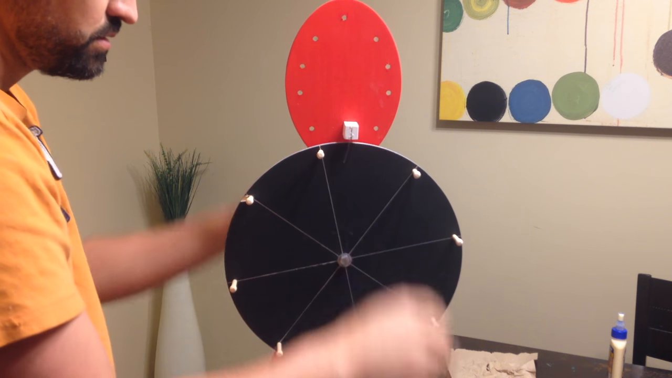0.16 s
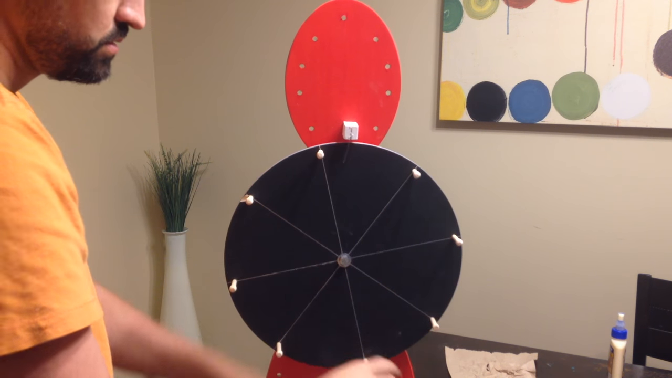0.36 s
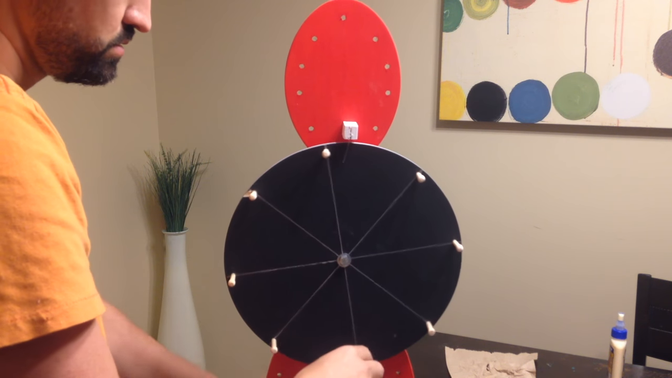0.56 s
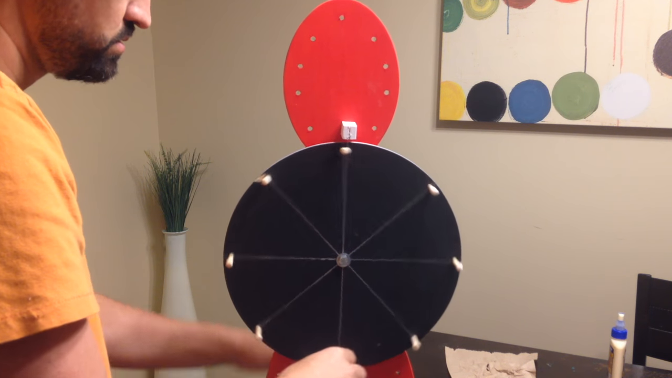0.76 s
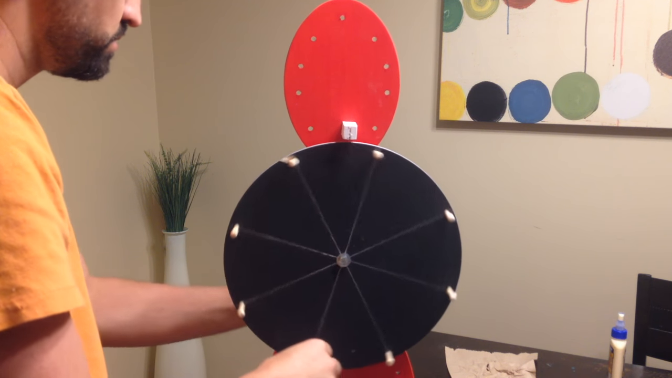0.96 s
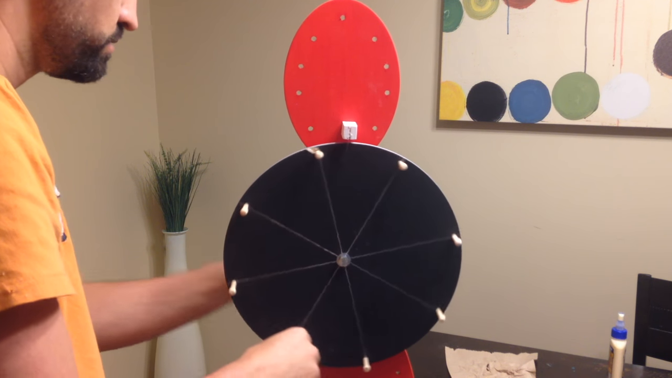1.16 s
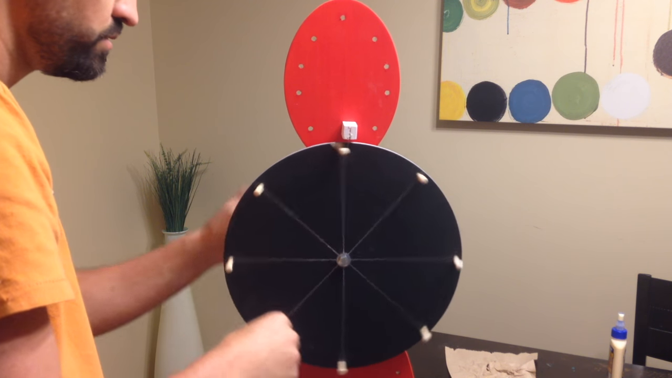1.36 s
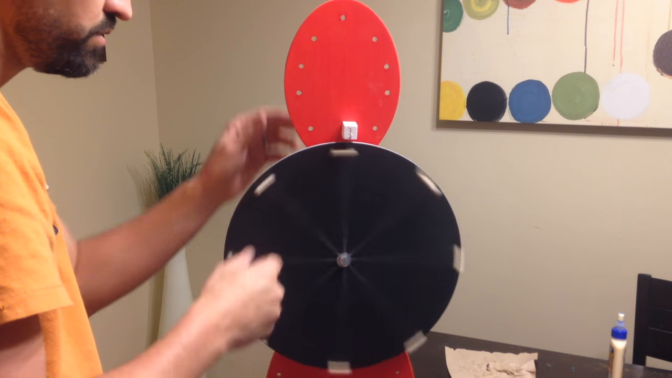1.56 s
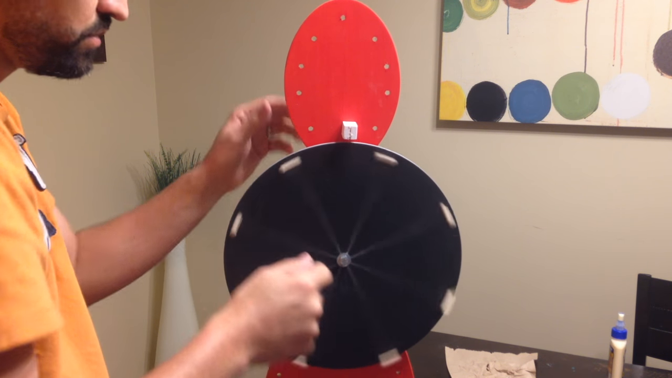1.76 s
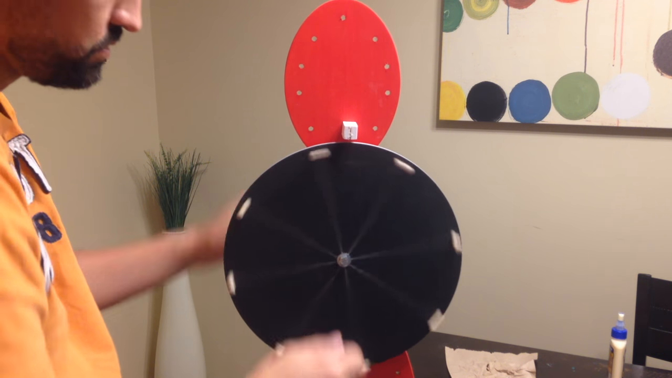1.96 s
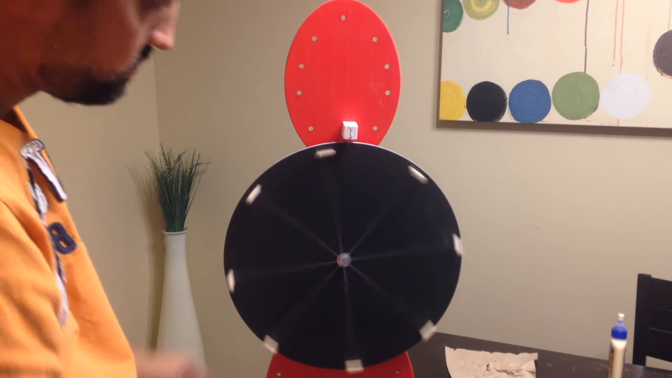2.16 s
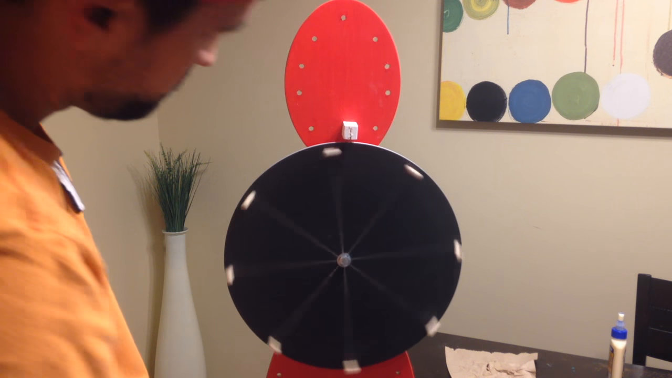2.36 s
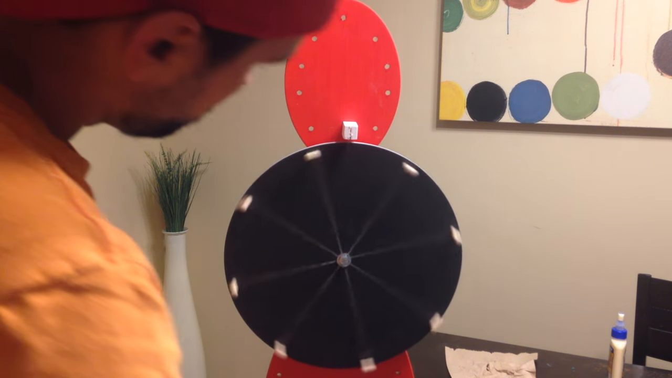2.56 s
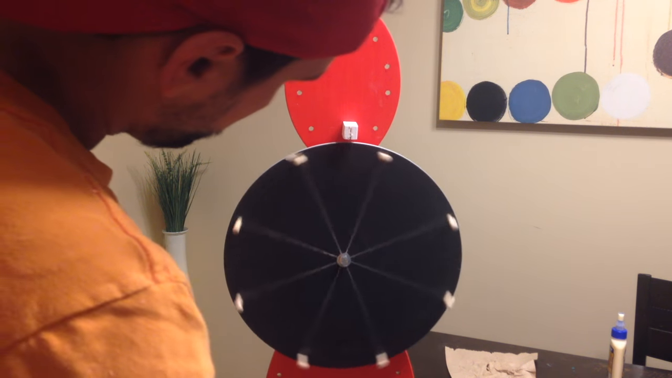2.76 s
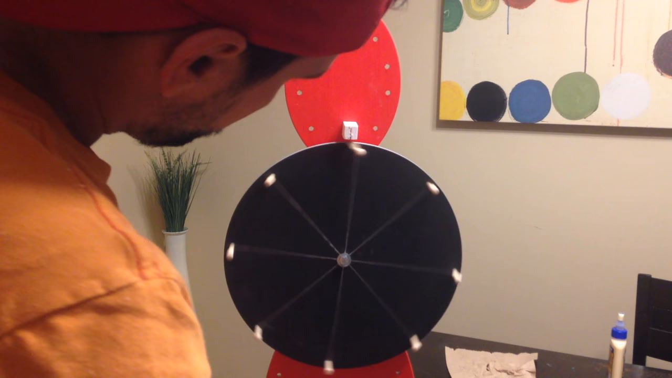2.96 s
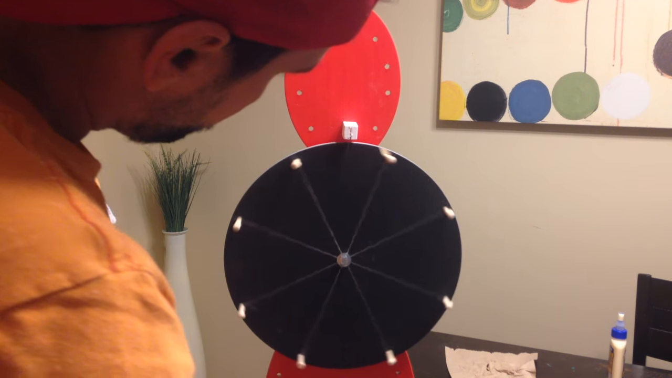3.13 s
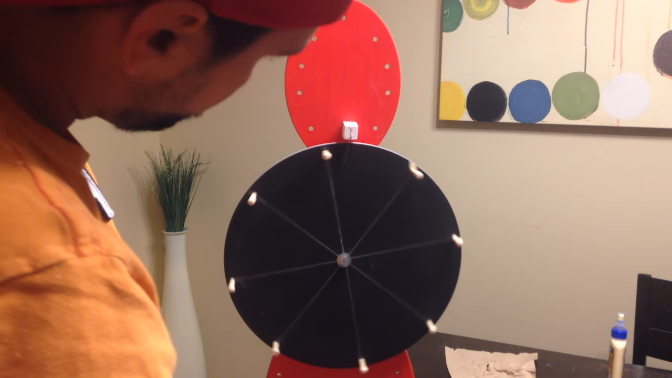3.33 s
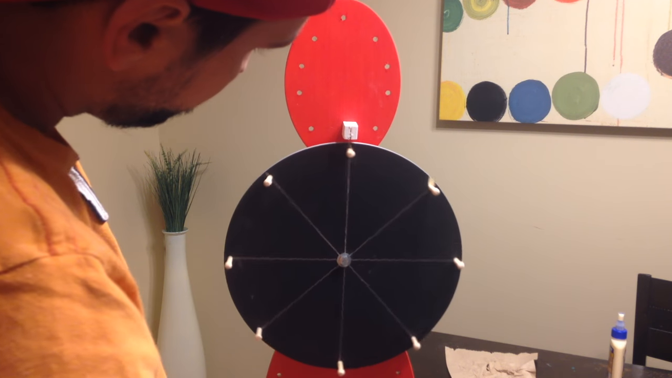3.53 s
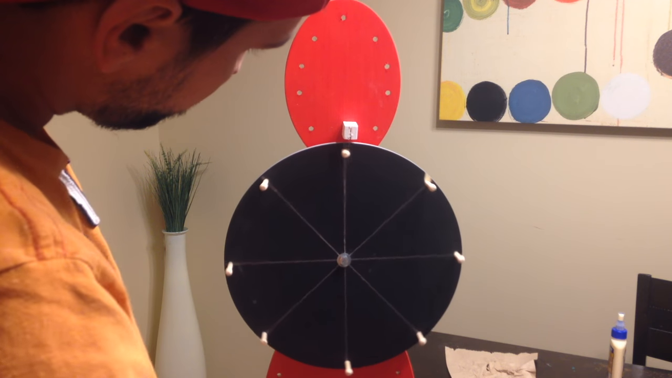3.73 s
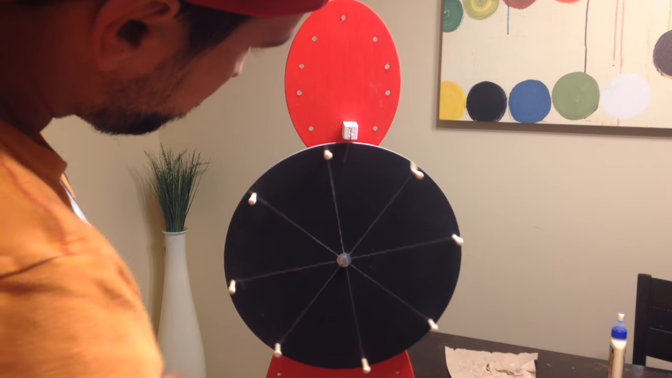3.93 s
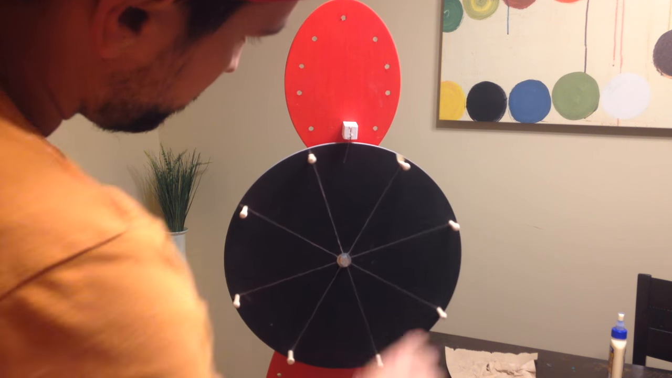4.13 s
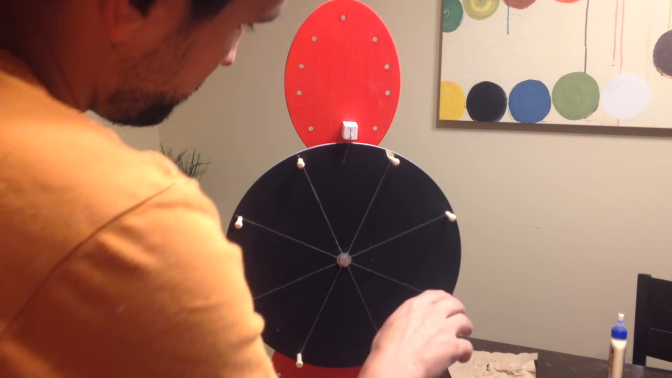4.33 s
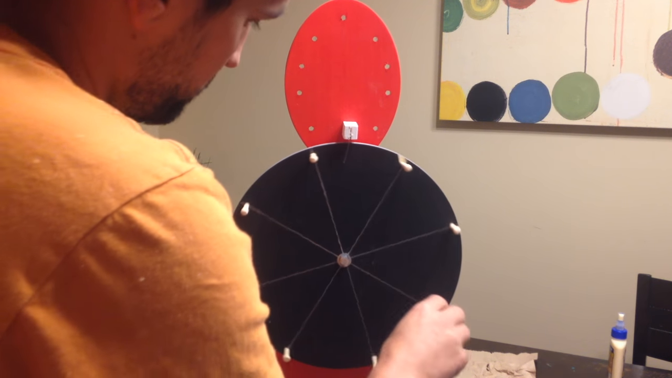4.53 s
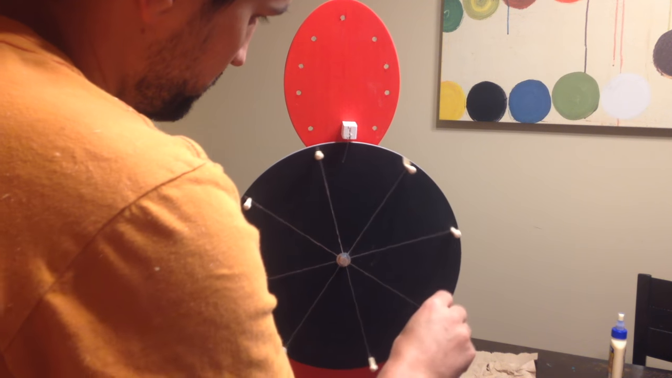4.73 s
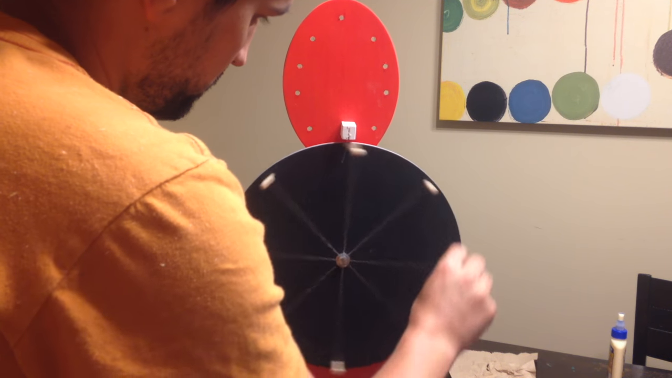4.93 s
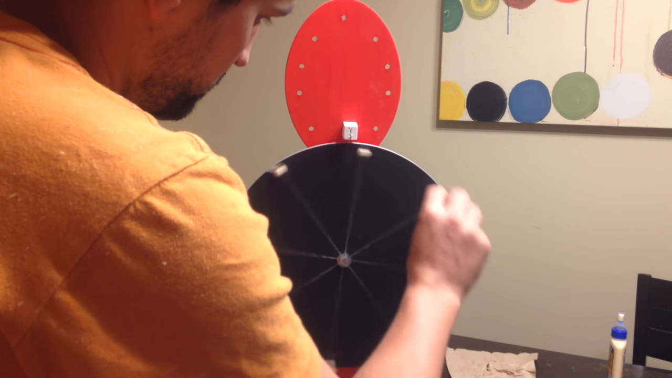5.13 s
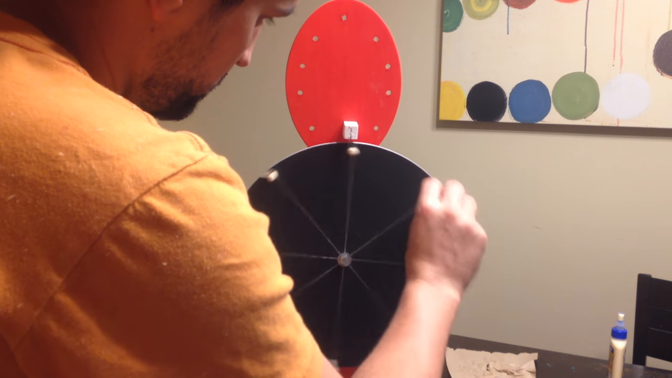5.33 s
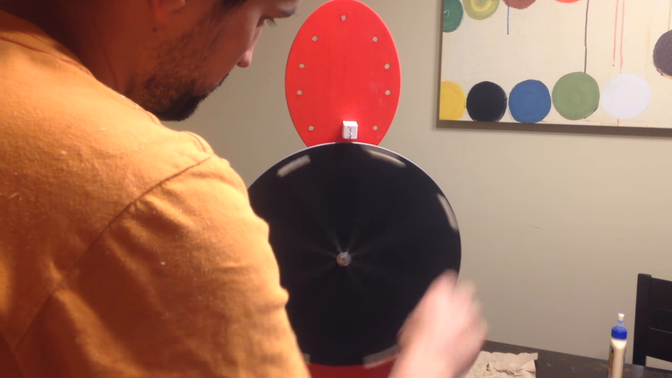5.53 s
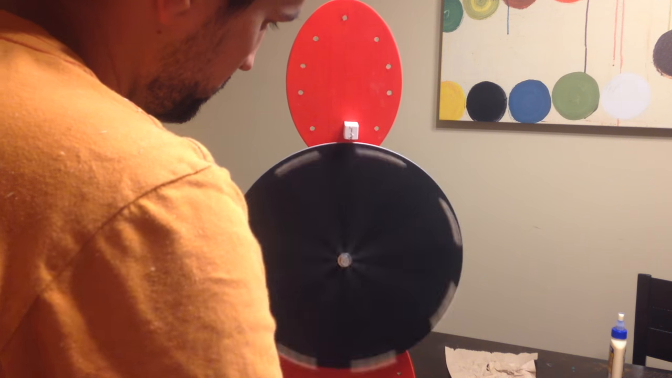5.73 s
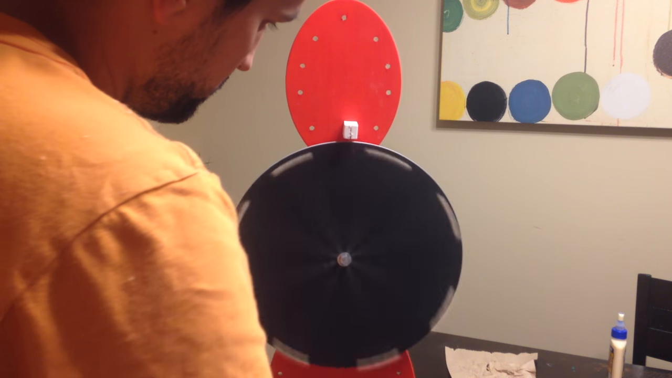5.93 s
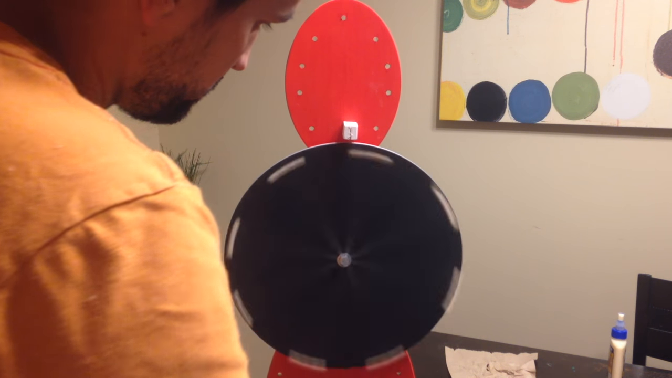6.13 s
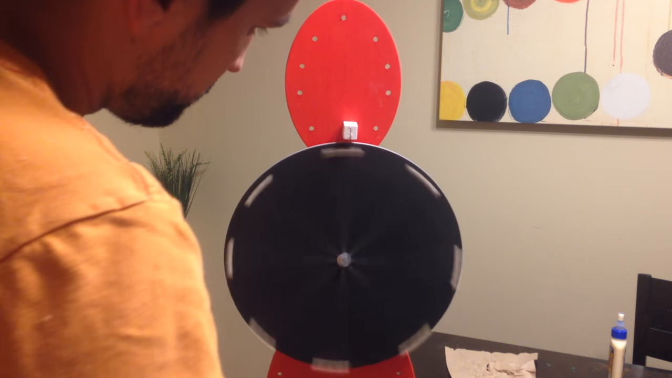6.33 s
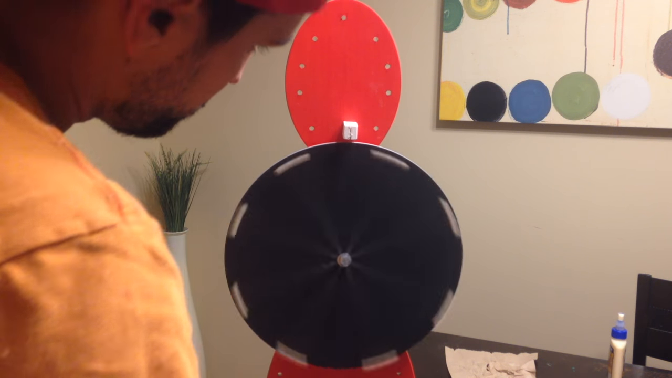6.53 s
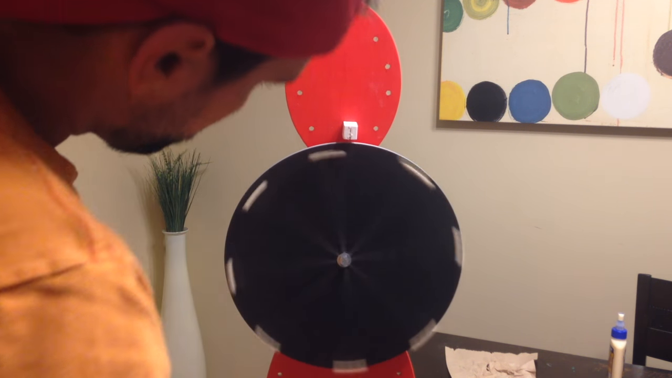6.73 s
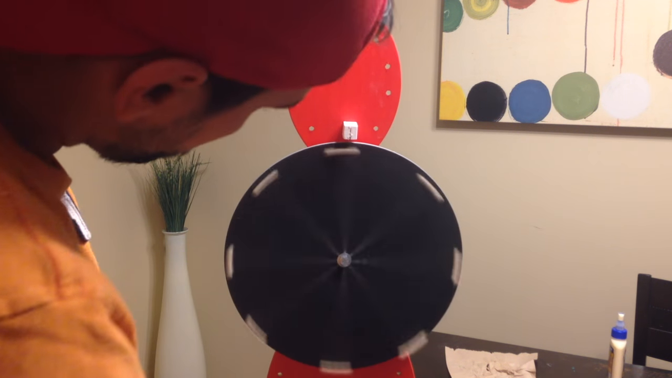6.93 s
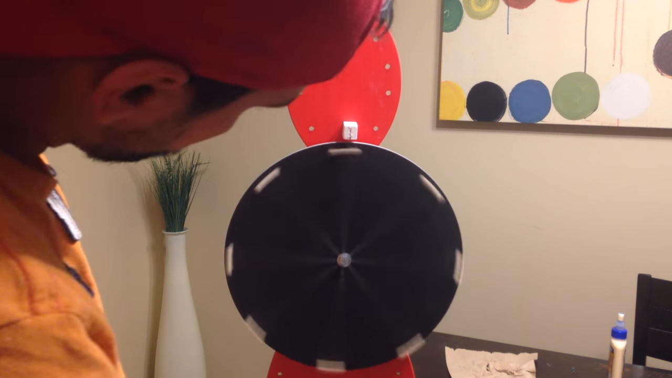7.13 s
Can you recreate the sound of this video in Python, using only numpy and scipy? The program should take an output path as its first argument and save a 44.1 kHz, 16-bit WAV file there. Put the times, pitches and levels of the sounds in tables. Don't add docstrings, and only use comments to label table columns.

```python
import sys
import numpy as np
from scipy import signal
from scipy.fft import rfft, irfft
from scipy.io import wavfile
from scipy.ndimage import uniform_filter1d

SR = 44100
rng = np.random.default_rng(int(sys.argv[2]) if len(sys.argv) > 2 else 0)


def digitize_waveform(pressure):
    field = np.atleast_2d(pressure).T
    bounded = np.clip(field, -1, 1)
    quanta = np.round(bounded * 32767).astype(np.int16)
    wavfile.write(sys.argv[1], SR, quanta)


def decibels_to_gain(level_db):
    exponent = np.asarray(level_db, float) / 20
    return 10 ** exponent


N = 316946


def evened(x):
    return x / np.sqrt(np.mean(x ** 2) + 1e-20)


def read(points, hz, axis=1):
    table = np.transpose(points)
    return np.interp(np.log(hz + 1), np.log(table[0] + 1), table[axis])


def coloured(points):
    hz = np.fft.rfftfreq(N, 1 / SR)
    spectrum = rfft(rng.standard_normal(N)) * decibels_to_gain(read(points, hz))
    return evened(irfft(spectrum, N))


def add(mix, s, sound):
    part = mix[round(s * SR):][:len(sound)]
    part += sound[:len(part)]


def ring(t, hz, t60_s, rise_s):
    return decibels_to_gain(-60 * t / t60_s) * (1 - np.exp(-t / rise_s)) * np.sin(2 * np.pi * hz * t)


def sparse_blows(t, per_s):
    return rng.standard_normal(len(t)) * (rng.random(len(t)) < per_s / SR)


# (frequency [Hz], level [dB rms])
HUM_PARTIALS = [(59.5, -62), (119, -87), (178.5, -91.5)]
# (frequency [Hz], density [dB per Hz])
HISS_SPECTRUM = [(20, -19), (45, -1), (85, -1.5), (123, -2.5), (250, -10), (600, -14.5), (1400, -22.5),
                 (1960, -21), (3230, -29.5), (4290, -23), (5300, -29.5), (6800, -31.5), (9000, -35.5),
                 (15500, -37.5)]


def background():
    hiss_db, waver_db = -67, 0.98
    t = np.arange(N) / SR
    waver = evened(uniform_filter1d(rng.standard_normal(N), 3000))
    hum = sum(decibels_to_gain(db) * np.sqrt(2) * np.sin(2 * np.pi * hz * t) for hz, db in HUM_PARTIALS)
    return decibels_to_gain(hiss_db) * coloured(HISS_SPECTRUM) + hum * decibels_to_gain(waver_db * waver)


# (start [s], length [s], level [dB])
RUB_EVENTS = [
    (0.53, 0.13, -71),
    (0.874, 0.42, -68),
    (4.362, 0.13, -61),
    (4.59, 0.22, -66),
    (4.86, 0.04, -77),
    (5.195, 0.15, -70),
]
# (frequency [Hz], density [dB per Hz])
RUB_SPECTRUM = [(200, -38), (500, -11), (1000, -9), (1600, -5), (2400, -6), (3300, -13), (5000, -21.5),
                (7000, -20.5), (9000, -26.5), (15500, -38)]


def rubs():
    rise_s, sag_db = 0.031, -4.5
    t, level = np.arange(N) / SR, np.zeros(N)
    for s, length_s, db in RUB_EVENTS:
        level += np.interp(t - s, [0, rise_s, length_s], [0, decibels_to_gain(db), decibels_to_gain(db + sag_db)], left=0, right=0)
    clumps_db = 3 * evened(uniform_filter1d(rng.standard_normal(N), 200))
    return uniform_filter1d(level, 700) * decibels_to_gain(clumps_db - 5.5) * coloured(RUB_SPECTRUM)


# (time [s], peak [dB], pitch [Hz])
PALM_BUMPS = [
    (.055, -48, 795),
    (.675, -50.5, 650),
    (.7, -49, 814),
    (1.04, -53, 490),
    (4.45, -53, 790),
    (5.125, -55, 950),
    (5.715, -39, 460),
    (3.145, -46, 557),
]


def bumps():
    out, t = np.zeros(N), np.arange(SR // 8) / SR
    for s, db, hz in PALM_BUMPS:
        add(out, s, decibels_to_gain(db) * ring(t, hz, t60_s=0.035, rise_s=0.003))
    return out


# (time [s], peak [dB], pitch [Hz])
FINGER_TAPS = [
    (3.5835, -63, 1250),
    (4.149, -57, 1630),
    (4.9187, -63.5, 2100),
    (5.3874, -49.5, 1580),
    (5.4563, -57, 2020),
    (5.5013, -43, 1740),
]
# (ratio to pitch, level [dB])
TAP_OVERTONES = [(1.2, 0), (1.42, -3), (2.36, -12.5), (3.0, -15)]


def taps():
    t60_s = 0.012
    out, t = np.zeros(N), np.arange(SR // 20) / SR
    for s, db, hz in FINGER_TAPS:
        upper = sum(decibels_to_gain(d) * ring(t, ratio * hz, t60_s, 0.00078) for ratio, d in TAP_OVERTONES)
        add(out, s, decibels_to_gain(db + 8) * (ring(t, hz, t60_s, 0.00022) + upper))
    return out


# (time [s], peak [dB], upper edge [Hz], sparkle [dB])
NAIL_FLICKS = [
    (0.6432, -29.5, 3780, -7.5),
    (0.653, -68, 3260, -8),
]


def flicks():
    def filtered(x, order, hz, kind):
        return signal.sosfilt(signal.butter(order, hz, kind, fs=SR, output="sos"), x)

    out = np.zeros(N)
    thin = filtered(signal.unit_impulse(SR // 20), 6, 1460, "high")
    sparkle = filtered(thin, 2, 7000, "low")
    for s, db, top_hz, sparkle_db in NAIL_FLICKS:
        dull = filtered(thin, 3, top_hz, "low")
        add(out, s, decibels_to_gain(db + 22) * (dull + decibels_to_gain(sparkle_db) * sparkle))
    return out


# (time [s], peak [dB], crack [dB rel], thud [dB rel])
SLAPS_SLOW = [(0.053, -57, -22, -14), (1.031, -37.5, -10.5, -20.5), (1.569, -37.5, -7, -17),
              (1.715, -36.5, -10.5, -20.5), (1.849, -36.5, -13.5, -24), (2.013, -37, -8, -21),
              (2.174, -35.5, -14, -25), (2.37, -38.5, -8.5, -25), (2.568, -36, -12.5, -24.5),
              (2.833, -39.5, -10, -20), (3.142, -39.5, -5, -21), (5.121, -46, -6, -27)]
# (time [s], peak [dB], crack [dB rel], thud [dB rel])
SLAPS_FAST = [(5.638, -37.5, -7.5, -16), (5.718, -30, -13, -18), (5.785, -39, -3, -26),
              (5.846, -37, -2, -12.5), (5.897, -35.5, 1, -39), (5.967, -28.5, -14, -21),
              (6.054, -33.5, -18, -23), (6.124, -38.5, -3.5, -25), (6.172, -38.5, -10, -38),
              (6.253, -38, -22, -10.5), (6.33, -40, -27, -40), (6.396, -40, 0.5, -13.5),
              (6.478, -37, -12, -25), (6.568, -38.5, -28, -24), (6.635, -33.5, -18, -21),
              (6.718, -39.5, -2.5, -22), (6.803, -36.5, -31, -20), (6.889, -39, -25, -21),
              (6.999, -42, -11, -33), (7.083, -38.5, -5, -16), (7.177, -36.5, -14, -32)]
# (frequency [Hz], level [dB], t60 [s])
BOARD_MODES = [(352.6, -18.5, 0.14), (520.5, -12.5, 0.062), (826, -17.5, 0.068), (893, -23, 0.091),
               (940, -9.5, 0.096), (1071, -14.5, 0.28), (1132, -9.5, 0.24), (1152, 1, 0.075),
               (1262, 1, 0.083), (1267, -8, 0.085), (1396, 1.5, 0.042), (1630, 2, 0.051), (1660, -4, 0.073),
               (2045, -2, 0.03), (2240, -16, 0.045), (2500, -41, 0.022), (2860, -0.5, 0.025),
               (2870, -1.5, 0.015), (3700, -7.5, 0.028), (4570, -39, .04)]
# (frequency [Hz], level [dB], t60 [s])
STAND_MODES = [(122.4, -2.5, 0.26), (181.8, -0.5, 0.14)]
# (frequency [Hz], density [dB per Hz])
SCRAPE_SPECTRUM = [(710, -26.5), (1200, -2.5), (2270, 5), (3220, -20.5), (3870, -14), (7820, -16),
                   (11400, -20), (14200, -17.5), (16000, -21)]


def struck_board(t, db, tilt_db, vary):
    firm_db, dull_db_per_db, detune = -34.5, 0.3776, 0.0087
    settle_per_s, settle_db, settle_t60_s = 500, -12.5, 0.071
    tilt_db = tilt_db + dull_db_per_db * min(db - firm_db, 0)
    modes = np.zeros(len(t))
    for (hz, d, t60_s), v, w in zip(BOARD_MODES, vary, vary[len(BOARD_MODES):]):
        mode_db = d + 2.2 * v + tilt_db * np.log2(hz / 1200)
        modes += decibels_to_gain(mode_db) * ring(t, hz * (1 + detune * w), t60_s, 0.001)
    blows = decibels_to_gain(settle_db - 60 * t / settle_t60_s) * sparse_blows(t, settle_per_s)
    blows[0] = 1
    return signal.fftconvolve(blows / np.linalg.norm(blows), decibels_to_gain(1.5) * modes)[:len(t)]


def tip_scrape(t, lead_s, noise, snap, whistle_hz):
    shape = np.where(t < lead_s, np.exp((t - lead_s) / 0.0012), decibels_to_gain(-60 * (t - lead_s) / 0.007))
    scrape = decibels_to_gain(-7) * shape * noise
    add(scrape, lead_s, decibels_to_gain(-16.5) * snap)
    return scrape + decibels_to_gain(1) * signal.lfilter(*signal.iirpeak(whistle_hz, 1.6, SR), scrape)


def slaps():
    slow_tilt_db, slow_tip_hz = 1.5, 8400
    fast_tilt_db, fast_tip_hz = -0.7, 6360
    tip_spread, lead_s = 0.056, 0.014
    out, t = np.zeros(N), np.arange(SR // 3) / SR
    rows = [(*p, slow_tilt_db, slow_tip_hz) for p in SLAPS_SLOW]
    rows += [(*p, fast_tilt_db, fast_tip_hz) for p in SLAPS_FAST]
    chatter = coloured(SCRAPE_SPECTRUM)
    snap_spectrum = decibels_to_gain(read(SCRAPE_SPECTRUM, np.fft.rfftfreq(256, 1 / SR)))
    snap = 2 * evened(np.roll(irfft(snap_spectrum), 128))
    thud = sum(decibels_to_gain(d) * ring(t, hz, t60_s, 0.022) for hz, d, t60_s in STAND_MODES)
    for s, db, crack_db, thud_db, tilt_db, tip_hz in rows:
        bend, *vary = rng.standard_normal(2 * len(BOARD_MODES) + 1)
        board = struck_board(t, db, tilt_db, vary)
        add(out, s, decibels_to_gain(db) * (decibels_to_gain(-4.5) * board + decibels_to_gain(thud_db + 6) * thud))
        noise = np.resize(chatter[round(s * SR):], len(t))
        scrape = tip_scrape(t, lead_s, noise, snap, tip_hz * (1 + tip_spread * bend))
        add(out, s - lead_s - 0.002, decibels_to_gain(db + crack_db + 11.5) * scrape)
    return out


# (time [s], peak [dB], peg pitch [Hz], rattle [dB rel])
PEGS_SLOW = [(0.0512, -55, 1610, -11), (0.54, -60.5, 2290, -23), (0.861, -57, 1910, -13.5),
             (0.9863, -53.5, 2020, -19), (1.1438, -51, 2000, -29), (1.4828, -48.5, 1920, -17),
             (1.5353, -52, 2300, -13), (1.6755, -33, 2310, -11), (1.8077, -37, 2500, -7.5),
             (1.9684, -35.5, 2090, -10), (2.1207, -33, 1710, -12.5), (2.3159, -43.5, 1790, -8.5),
             (2.5038, -47, 2170, -7.5), (2.757, -45.5, 1820, -12), (3.028, -36, 1980, -24.5),
             (4.3932, -50.5, 2370, -31), (5.0686, -37, 1955, -22)]
# (time [s], peak [dB], peg pitch [Hz], rattle [dB rel])
PEGS_FAST = [(5.6077, -31, 2100, -18.5), (5.695, -30, 2440, -6.5), (5.7524, -30.5, 1600, -3),
             (5.8237, -23, 2240, -13.5), (5.881, -22, 2280, -16.5), (5.9539, -22.5, 2450, -15),
             (6.0133, -26.5, 2300, -11.5), (6.0863, -37, 2240, -3.5), (6.1585, -20, 1910, -19),
             (6.2256, -31.5, 2060, -5), (6.2985, -34.5, 1720, -2.5), (6.3803, -25.5, 2115, -14),
             (6.4514, -19.5, 2283, -17.5), (6.5356, -30.5, 1680, -10), (6.608, -23, 2280, -12.5),
             (6.695, -33.5, 1900, -11), (6.773, -27, 2300, -12), (6.8667, -26.5, 2310, -10.5),
             (6.9535, -35.5, 2260, -5.5), (7.0535, -31, 1660, -14.5), (7.1437, -25, 2280, -14)]
# (time [s], peak [dB], pitch [Hz])
PEG_SKIPS = [(1.657, -39, 1580), (1.6932, -32, 2240), (1.8241, -29.5, 2530), (2.1444, -32.5, 2270),
             (2.358, -43.5, 2406), (2.514, -45, 1670), (2.5296, -38, 2380), (3.023, -45, 2120),
             (3.0454, -52, 2040), (2.334, -44, 2010), (2.775, -45, 1930), (5.075, -48, 2080),
             (4.4083, -56, 2570), (5.8956, -26, 2550), (5.968, -22, 2314), (6.025, -23.5, 2350),
             (6.1005, -30, 1940), (6.2323, -24, 2220), (6.3063, -26.5, 2590), (6.5487, -27.5, 2490),
             (6.6294, -29, 2220), (6.7938, -28.5, 1820), (6.9612, -30.5, 2500), (7.005, -48, 1990),
             (7.0644, -28, 2094), (7.1594, -44, 2260)]
# (frequency [Hz], density [dB per Hz])
RATTLE_SPECTRUM = [(240, -31), (400, -26.5), (839, -15), (1110, -5), (1460, -8.5), (2290, -4), (3070, -12),
                   (3690, -10.5), (14600, -27), (16000, -24)]


def peg_tick(t, hz):
    grip = rng.uniform(0.11, 0.173, 2)
    tick = ring(t, hz, 0.014, 0.001)
    tick += decibels_to_gain(-14) * ring(t, (1 + grip[0]) * hz, 0.023, 0.0036)
    tick += decibels_to_gain(-13) * ring(t, (1 - grip[1]) * hz, 0.013, 0.0015)
    return tick + decibels_to_gain(-14.5) * ring(t, 1.65 * hz, 0.012, 0.002)


def knocks():
    slow_t60_s, fast_t60_s = 0.06, 0.072
    skip_rattle_db, skip_t60_s = -20.5, 0.041
    out, t = np.zeros(N), np.arange(SR // 10) / SR
    rows = [(*p, slow_t60_s) for p in PEGS_SLOW]
    rows += [(*p, fast_t60_s) for p in PEGS_FAST]
    rows += [(*p, skip_rattle_db, skip_t60_s) for p in PEG_SKIPS]
    chatter = coloured(RATTLE_SPECTRUM)
    for s, db, hz, rattle_db, t60_s in rows:
        tick = peg_tick(t, hz)
        drag = decibels_to_gain(-60 * t / t60_s) * (1 - np.exp(-t / (0.088 * t60_s)))
        blows = decibels_to_gain(2) * drag * sparse_blows(t, 350)
        blows[0] = decibels_to_gain(3.5)
        noise = np.resize(chatter[round(s * SR):], len(t))
        add(out, s, decibels_to_gain(db + 5.5) * signal.fftconvolve(blows, tick)[:len(t)])
        add(out, s - 0.0025, decibels_to_gain(db + rattle_db + 12) * drag * noise)
    return out


# (frequency [Hz], t60 [s], tail level [dB])
ROOM_DECAY = [(200, 0.91, -2.5), (980, 0.56, -4), (2300, 0.5, -5), (3550, 0.49, -3.5), (6850, 0.5, -7.5),
              (15000, 0.41, -2.5)]


def tail():
    impulses = np.zeros(SR // 2)
    at = np.arange(200, len(impulses) - 20, 20)
    impulses[at + rng.integers(0, 20, len(at))] = rng.choice([-1., 1.], len(at))
    hz, t, z = signal.stft(impulses, SR, nperseg=256)
    t60_s = read(ROOM_DECAY, hz)[:, None]
    level_db = read(ROOM_DECAY, hz, axis=2)[:, None]
    return signal.istft(z * decibels_to_gain(level_db - 60 * t / t60_s), SR, nperseg=256)[1]


# (delay [s], level [dB])
EARLY_ECHOES = [(.0045, -9.5), (.009, -12.5), (.015, -9), (.021, -21.5), (.034, -18.5)]


def room(x):
    stir_hz, tail_db = 14, -15.5
    out = x.copy()
    stir = evened(uniform_filter1d(rng.standard_normal(N), 1500))
    turn = 2 * np.pi * stir_hz * np.cumsum(stir) / SR
    for k, (s, db) in enumerate(EARLY_ECHOES):
        add(out, s, (-1) ** k * decibels_to_gain(db) * x[:N - round(s * SR)])
    for share in np.cos(turn), np.sin(turn):
        out += decibels_to_gain(tail_db) * share * signal.fftconvolve(x, tail())[:N]
    return out


def scene():
    wheel = knocks() + slaps() + flicks() + taps() + bumps()
    return (room(decibels_to_gain(-2) * wheel + rubs()) + background())[None]


def roll_off(x):
    return signal.sosfilt(signal.butter(12, 16360, fs=SR, output="sos"), x)


def record(dry):
    edge = signal.firwin(255, 15450, window=("kaiser", 8), fs=SR)
    mix = signal.oaconvolve(dry, edge[None], "same")
    return roll_off(mix)


dry = scene()
out = record(dry)
digitize_waveform(out)
```